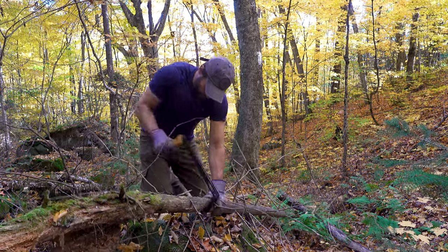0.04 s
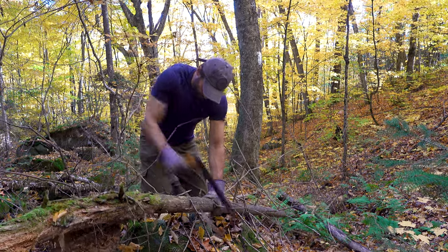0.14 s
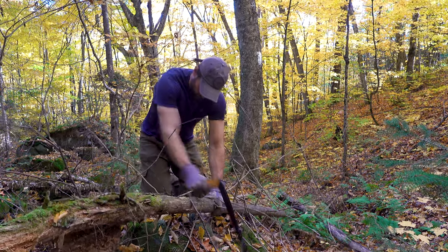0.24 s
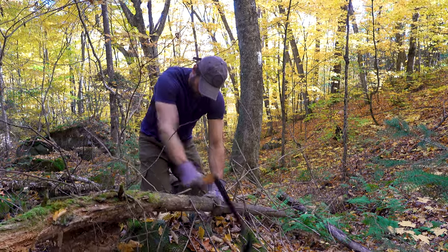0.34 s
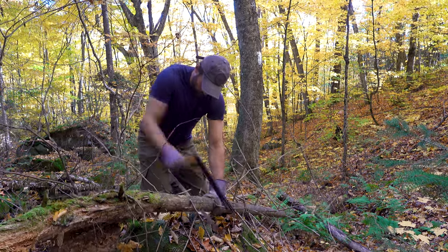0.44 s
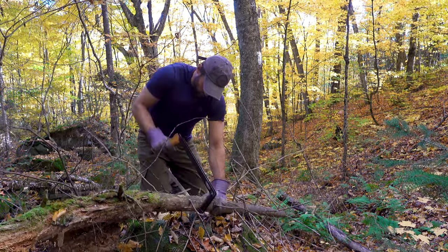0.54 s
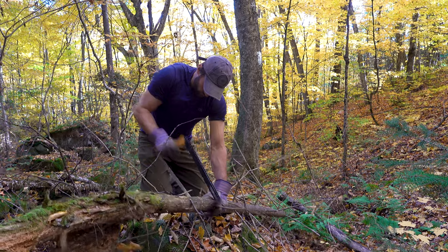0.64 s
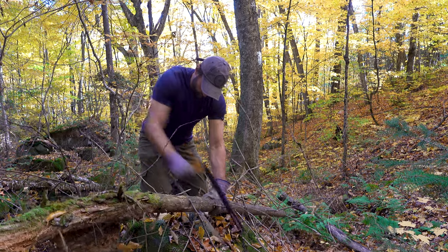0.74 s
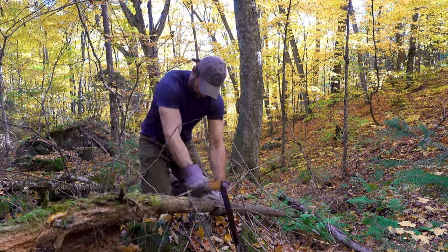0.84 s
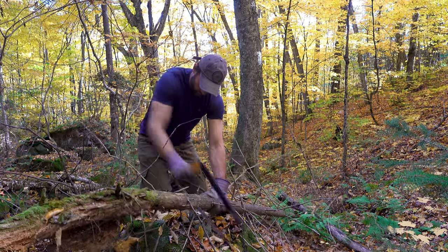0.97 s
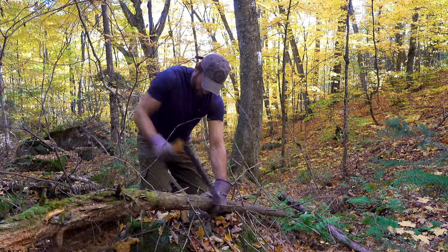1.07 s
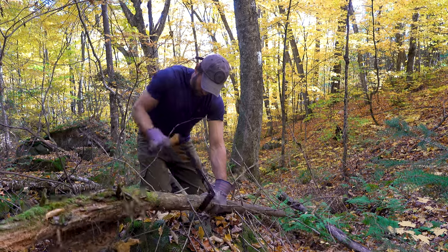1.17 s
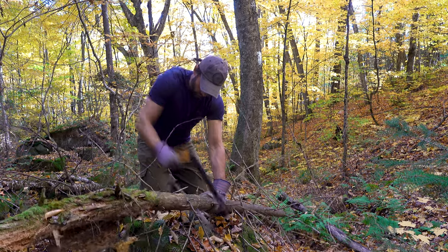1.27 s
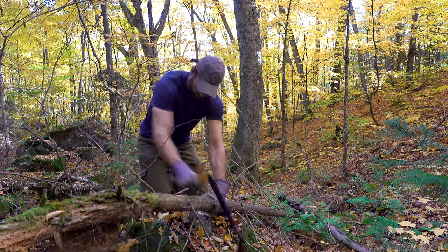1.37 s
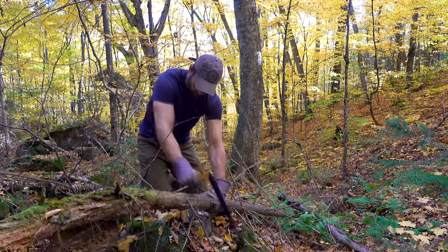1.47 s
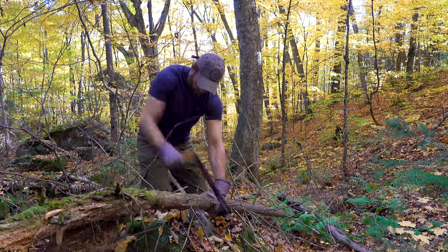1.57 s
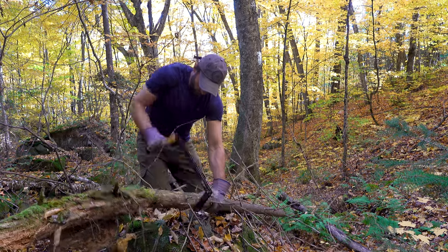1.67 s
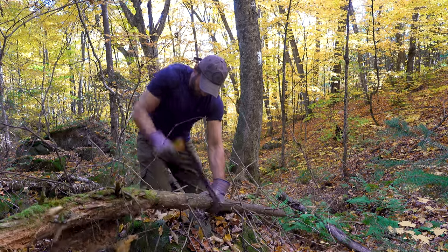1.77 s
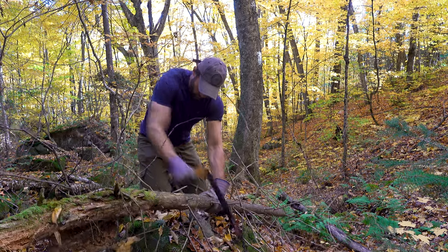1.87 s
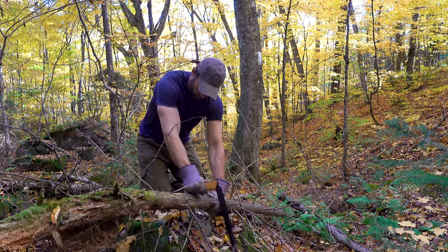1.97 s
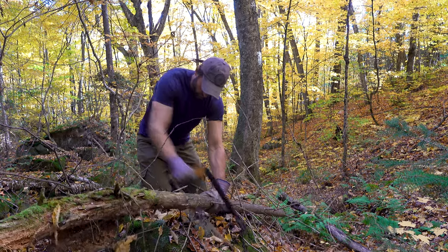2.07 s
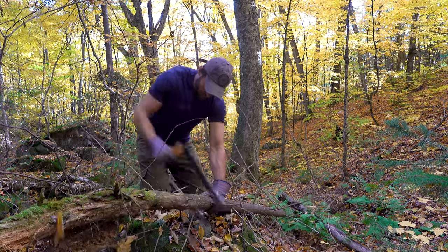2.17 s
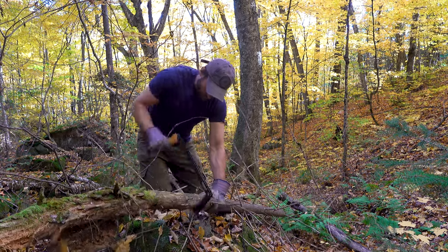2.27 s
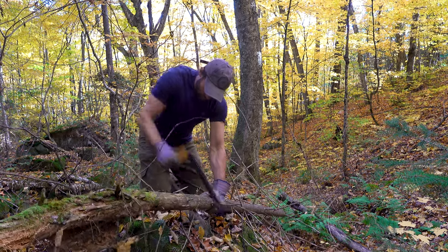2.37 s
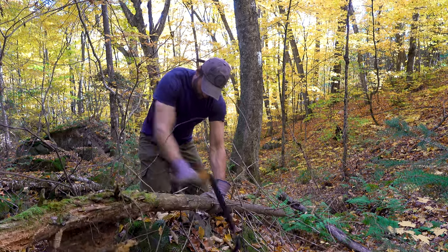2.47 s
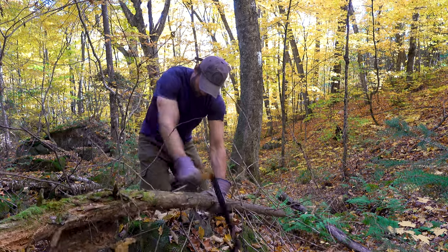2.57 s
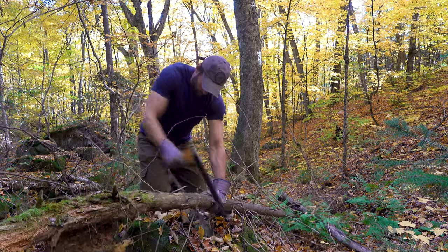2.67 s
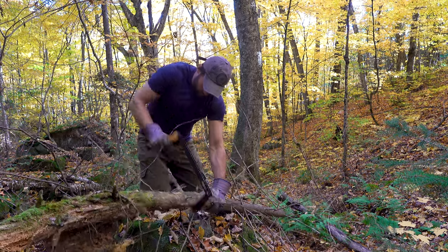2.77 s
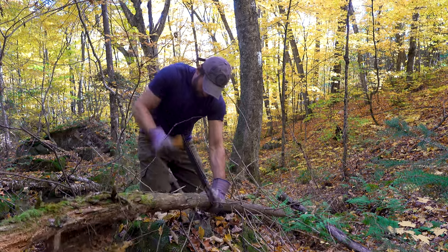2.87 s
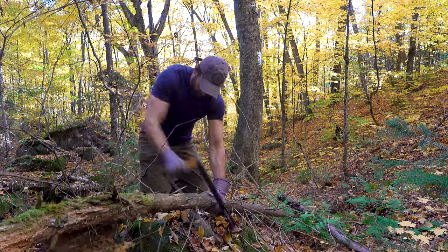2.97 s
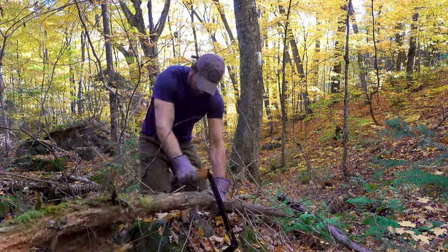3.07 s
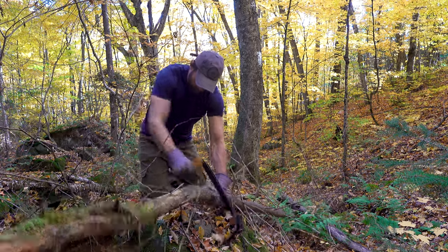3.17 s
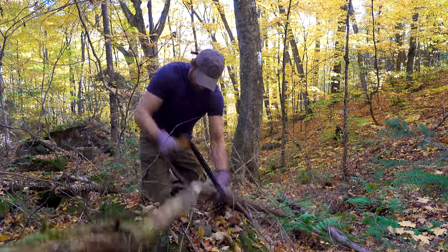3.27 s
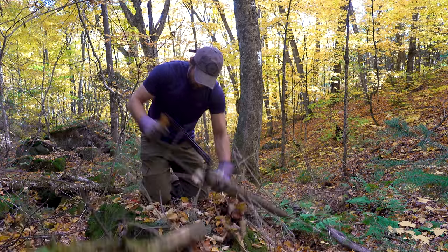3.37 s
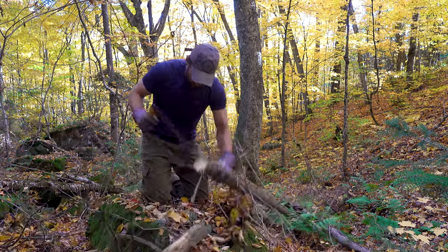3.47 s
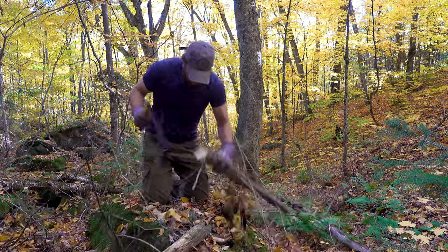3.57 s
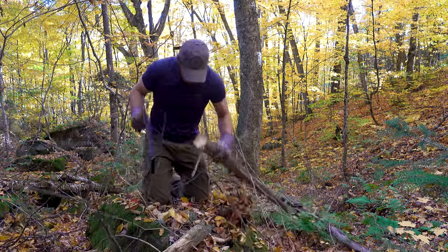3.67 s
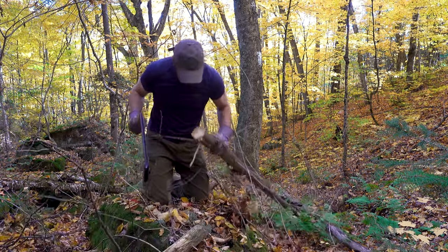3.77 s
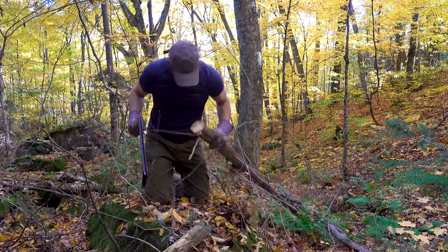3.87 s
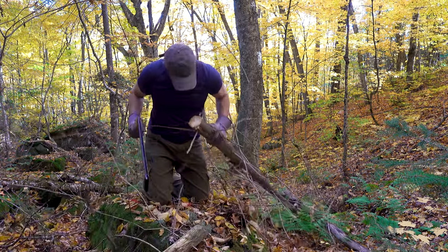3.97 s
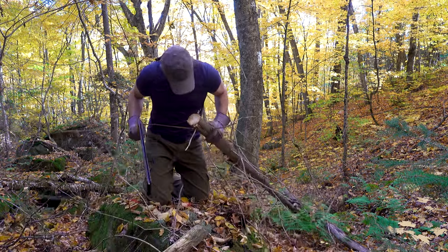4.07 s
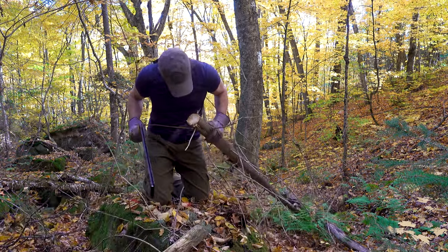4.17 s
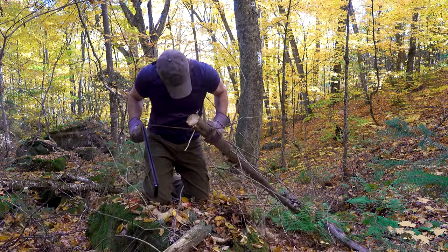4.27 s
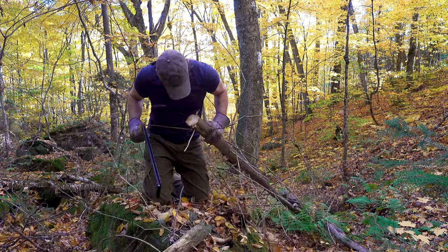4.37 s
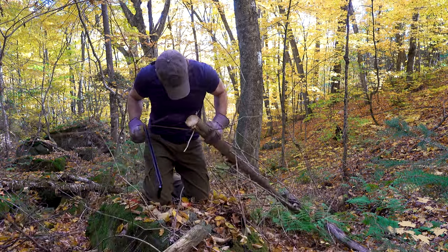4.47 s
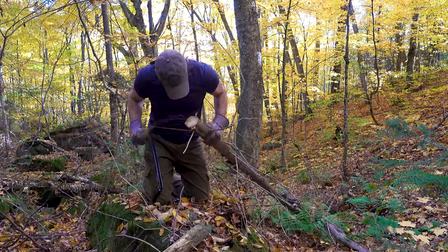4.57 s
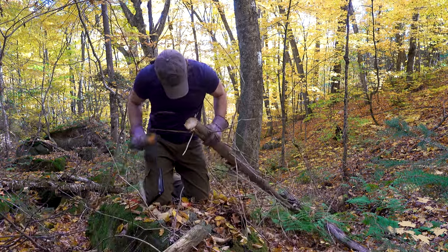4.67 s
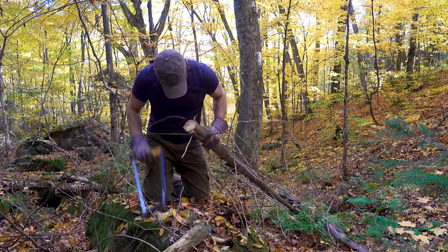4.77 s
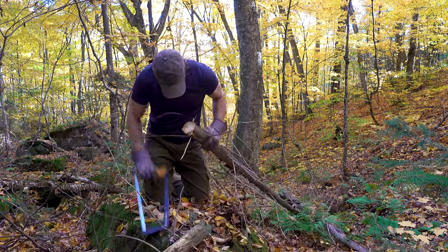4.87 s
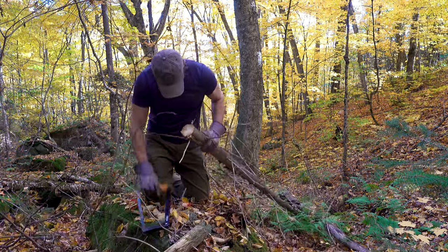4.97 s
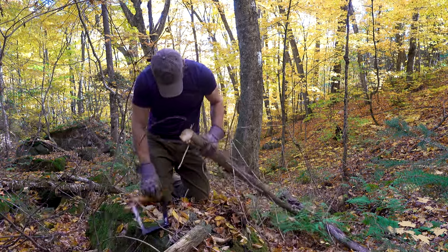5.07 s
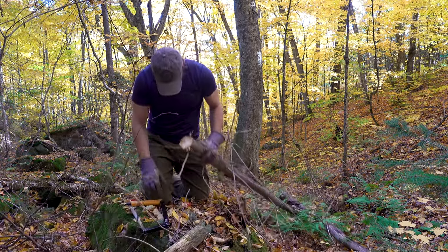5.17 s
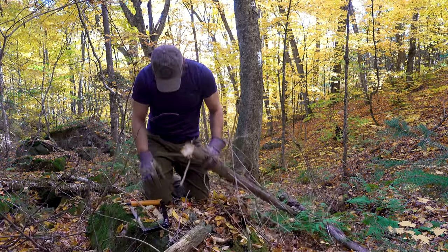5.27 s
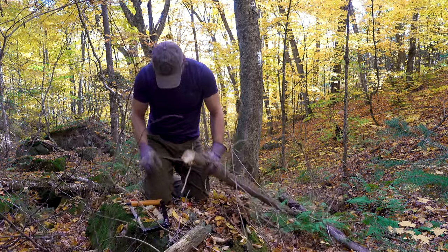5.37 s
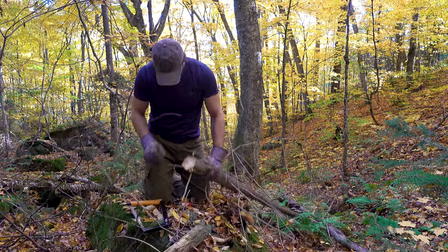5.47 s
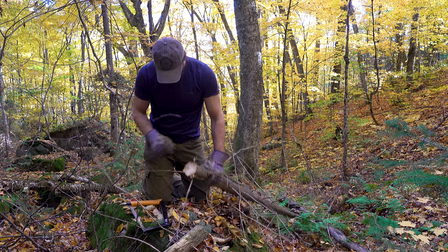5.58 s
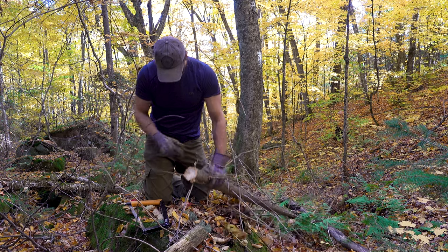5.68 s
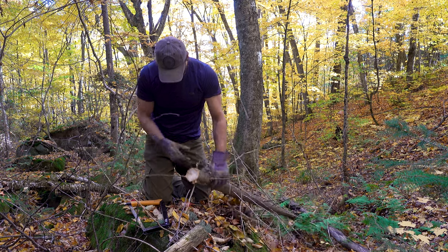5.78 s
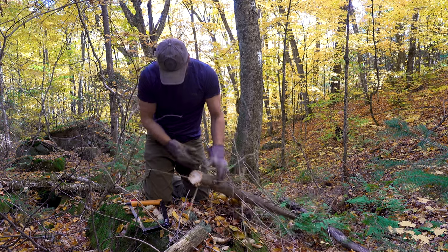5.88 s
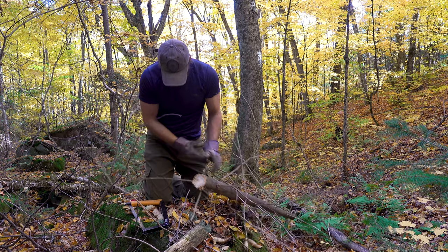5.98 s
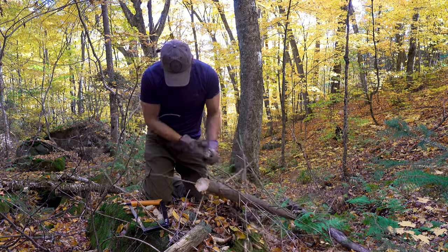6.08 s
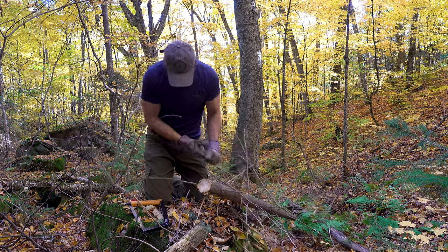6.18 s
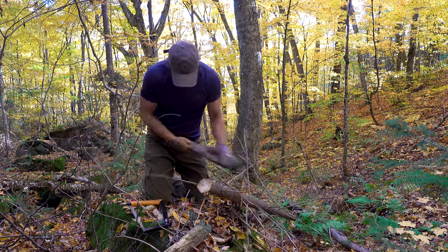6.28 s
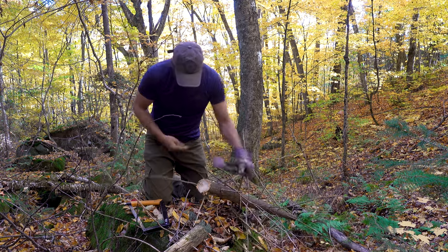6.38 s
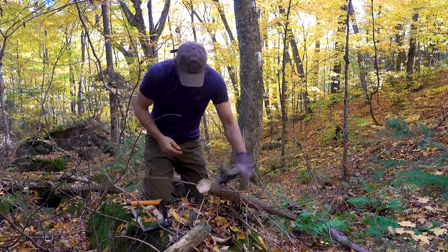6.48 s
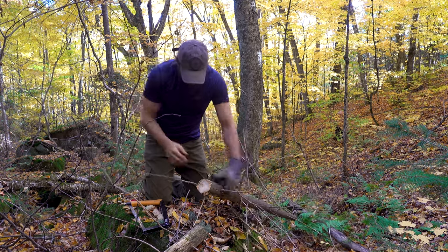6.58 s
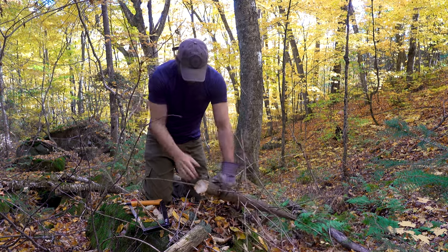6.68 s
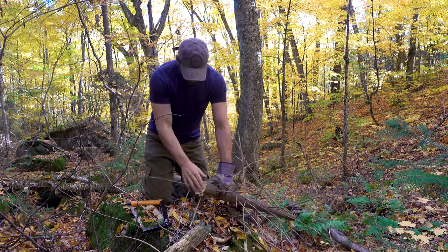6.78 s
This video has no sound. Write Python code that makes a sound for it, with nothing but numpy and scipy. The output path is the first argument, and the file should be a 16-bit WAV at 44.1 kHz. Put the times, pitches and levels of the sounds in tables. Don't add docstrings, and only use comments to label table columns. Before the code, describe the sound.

A hand saw rasps back and forth through a branch, which cracks and drops into dry leaves; later the saw clanks down amid rustling twigs.

```python
import sys
import numpy as np
from scipy import signal
from scipy.fft import rfft, irfft
from scipy.io import wavfile
from scipy.ndimage import uniform_filter1d

SR = 44100
rng = np.random.default_rng(int(sys.argv[2]) if len(sys.argv) > 2 else 0)


def gain_from_db(level_db):
    decades = np.asarray(level_db, float) / 20
    return 10 ** decades


def digitize_waveform(pressure):
    field = np.atleast_2d(pressure).T
    bounded = np.clip(field, -1, 1)
    quanta = np.round(bounded * 32767).astype(np.int16)
    wavfile.write(sys.argv[1], SR, quanta)


N = 300759

# (frequency [Hz], width [Hz], level [dB])
BLADE_MODES = [(1385, 80, -12), (1960, 6, 7), (2058, 30, 3), (2435, 35, -6), (2608, 30, -2), (2830, 35, -7),
               (3082, 40, -3), (3260, 55, -6), (3572, 35, -6), (4130, 60, -11), (4540, 90, -14),
               (5450, 80, -15), (5880, 60, -17), (13780, 70, -19)]


def evened(x):
    return x / np.sqrt(np.mean(x ** 2) + 1e-20)


def peaked(x):
    return x / abs(x).max()


def add(mix, s, sound):
    part = mix[round(s * SR):][:len(sound)]
    part += sound[:len(part)]


def colour(x, points, lo_hz=0, hi_hz=SR):
    f, level_db = np.transpose(points)
    hz = np.fft.rfftfreq(len(x), 1 / SR) + 1
    band = 1 / np.sqrt((1 + (lo_hz / hz) ** 8) * (1 + (hz / hi_hz) ** 8))
    shape = gain_from_db(np.interp(np.log(hz), np.log(f), level_db))
    return evened(irfft(rfft(x) * band * shape, len(x)))


def ring(x, hz, width):
    r = np.exp(-np.pi * width / SR)
    return 2 * signal.lfilter([1 - r], [1, -r * np.exp(2j * np.pi * hz / SR)], x).real


def wander(count, span):
    return evened(uniform_filter1d(uniform_filter1d(rng.standard_normal(count), span), span))


def grit(count, per_s, spread_db):
    hit = rng.random(count) < per_s / SR
    size = rng.exponential(1, count)
    sign = rng.standard_normal(count)
    return evened(hit * sign * gain_from_db(spread_db * np.minimum(size, 4)))


def patchy(x, depth_db, frames, bins):
    z = signal.stft(x, nperseg=256)[2]
    field = uniform_filter1d(rng.standard_normal(z.shape), bins, axis=0)
    field = uniform_filter1d(field, frames, axis=1)
    return evened(signal.istft(z * gain_from_db(depth_db * evened(field)), nperseg=256)[1][:len(x)])


def air():
    # (frequency [Hz], density [dB per Hz])
    air_spectrum = [(12, -31), (20, 0.5), (138, -4.5), (558, -3.5), (2460, -5.5), (3740, -2), (7110, -8),
                    (8410, -2.5), (9670, -19), (13900, -6), (16000, -28)]
    level = gain_from_db(-58 - 1.5 + wander(N, span=4000))
    return level * colour(rng.standard_normal(N), air_spectrum, 0, 12000)


def forest(x):
    t = np.arange(SR // 2) / SR
    taps = grit(len(t), 3000, 0.39) * (t > .004)
    low = signal.lfilter(*signal.butter(1, 3000, fs=SR), taps)
    tail = low * gain_from_db(-60 * t / 0.24) + (taps - low) * gain_from_db(-60 * t / 0.095)
    return signal.fftconvolve(x, tail / np.linalg.norm(tail))[:N]


def leaves():
    # (time [s], level [dB])
    leaf_levels = [(3.1, -35.5), (3.18, -44), (3.38, -34.5), (3.6, -43), (3.98, -54), (4.34, -53),
                   (4.52, -61), (4.72, -63.5), (4.95, -58), (5.1, -46.5), (5.37, -53), (5.68, -48),
                   (5.83, -54), (6.16, -51.5), (6.29, -62.5), (6.46, -61.5), (6.82, -59)]
    # (frequency [Hz], density [dB per Hz])
    leaf_spectrum = [(59, -38), (100, -12.5), (210, -13), (266, -6.5), (358, -7), (872, -1.5), (1060, -2),
                     (3780, -2.5), (6700, -6), (7940, -2), (10000, -13.5), (13500, -8.5), (16000, -19.5)]
    # (time [s], peak [dB], length [s], relative dull part [dB])
    sweeps = [(3.266, -33, 0.033, -5.5), (3.374, -40, 0.041, 2), (3.395, -29, 0.087, -5.5),
              (3.646, -56, 0.053, 7), (3.864, -48, 0.13, -7.5), (4.356, -51.5, 0.16, -23),
              (4.926, -42, 0.088, 1), (5.1, -43.5, 0.034, 1), (5.65, -58, 0.17, 3.5),
              (6.005, -50.5, 0.11, -3.5), (6.126, -44.5, 0.048, -25), (6.211, -52, 0.13, 0),
              (6.62, -63.5, 0.061, 3)]
    s, level_db = np.transpose(leaf_levels)
    t = np.arange(N) / SR
    clumps = gain_from_db(1.5 * wander(N, span=150) + 1. * wander(N, span=1200))
    rustle = evened(clumps * (rng.standard_normal(N) + 0.47 * grit(N, 1500, 2.0)))
    rustle = patchy(rustle, 3., frames=3, bins=10)
    crisp = gain_from_db(np.interp(t, s, level_db, left=-60.))
    dull = gain_from_db(-14.) * crisp ** .8
    for start, db, length, rel_db in sweeps:
        u = np.clip((t - start) / length, 0, 9)
        swell = gain_from_db(db) * np.minimum(u / 0.27, 1) * np.exp(-u ** 4.2)
        crisp = np.hypot(crisp, swell)
        dull = np.hypot(dull, swell * gain_from_db(rel_db))
    return crisp * colour(rustle, leaf_spectrum, 2880) + dull * colour(rustle, leaf_spectrum, 67, 2250)


def thump(db, hz, t60):
    t = np.arange(12000) / SR
    decay = gain_from_db(db - 60 * t / np.clip(t60, .05, .3))
    return decay * np.sin(2 * np.pi * hz * t) * (1 - np.exp(-t / 0.0059)) * 3.3


def clank(db, rattle, centre_hz):
    t = np.arange(9000) / SR
    u = t / np.clip(rattle, .0005, .05)
    knock = rng.standard_normal(len(t)) * np.sqrt(u) * np.exp(-u ** 2)
    modes = 0
    for hz, width, mode_db in BLADE_MODES[2:-1]:
        width = width + 30
        weight = gain_from_db(1.37 * mode_db - 4.7 * np.log2(hz / centre_hz) ** 2)
        modes = modes + weight * ring(knock, hz, width) / np.sqrt(width)
    thick = ring(ring(knock, centre_hz, 1100), centre_hz, 1100)
    metal = peaked(modes) + 0.72 * peaked(thick)
    return gain_from_db(db) * signal.lfilter(*signal.butter(4, 1700, "high", fs=SR), metal)


def crack(db, hz, bright_db, thud_db, t60):
    t = np.arange(4000) / SR
    snap_decay = gain_from_db(-60 * t / .007)
    splinter_decay = .3 * gain_from_db(-60 * t / np.clip(t60, .005, .2))
    burst = rng.standard_normal(len(t)) * (snap_decay + splinter_decay)
    burst[0] = 1
    wood = ring(burst, hz, 0.38 * hz) + 0.31 * ring(burst, 1.88 * hz, 0.32 * hz)
    wood += 0.065 * ring(burst, 1400, 670)
    wood = signal.lfilter(*signal.butter(2, 200, "high", fs=SR), wood)
    tick = signal.lfilter(*signal.butter(2, (3800, 13500), "band", fs=SR), burst)
    thud = np.sin(2 * np.pi * 220 * t * np.exp(-t / 0.11))
    thud += 0.33 * (np.sin(2 * np.pi * 820 * t) + np.sin(2 * np.pi * 430 * t))
    thud *= gain_from_db(-60 * t / 0.021)
    return gain_from_db(db) * (0.68 * peaked(wood) + 0.57 * gain_from_db(bright_db) * peaked(tick) + 0.74 * gain_from_db(thud_db) * thud)


def snaps():
    # (time [s], peak [dB], ring [Hz], relative thud [dB])
    knocks = [
        (0.611, -26, 683, -8),
        (1.185, -24, 745, -8),
        (1.726, -21, 632, -8),
        (2.306, -21., 624, -12.5),
        (2.833, -8.5, 476, -19.5),
    ]
    # (time [s], peak [dB],
    # ring [Hz], relative bright part [dB])
    fibres = [(0.301, -23, 2060, 8.5), (0.41, -19.5, 1740, -23), (0.42, -20, 1550, -31),
              (0.693, -24.5, 1190, -22), (0.95, -26.5, 1400, -6), (1.474, -23.5, 3180, -34),
              (1.84, -34, 2030, -14), (2.003, -7.5, 2860, -11), (2.369, -29, 2050, 0.1),
              (2.561, -9, 3100, -15), (2.624, -19.5, 1425, 1.5), (2.64, -26, 821, 8),
              (2.69, -21, 2050, -28), (2.84, -15, 515, 3.5), (3.049, -14, 4500, -3)]
    # (time [s], peak [dB], ring [Hz], relative bright part [dB])
    breaking = [(3.072, -15, 3324, 1.5), (3.116, -11, 980, -10), (3.12, -8, 3160, -0.5),
                (3.14, -16.5, 750, -6), (3.156, -13.5, 540, 9.5), (3.206, -14, 590, 7.5),
                (3.218, -13, 1210, -16), (3.235, -9.5, 2070, -23), (3.299, -12.5, 2480, -6),
                (3.335, -22, 3450, 2), (3.366, -16, 3390, 3), (3.385, -12, 3680, 5.5),
                (3.428, -17, 1170, -14), (3.452, -16, 1540, -14), (3.464, -17, 2180, -17),
                (3.499, -16, 1440, -1), (3.535, -10.5, 1430, -17)]
    # (time [s], peak [dB], ring [Hz], relative
    # bright part [dB])
    twigs = [(3.83, -32, 3460, -13), (3.882, -30, 4000, -7), (3.917, -33, 3500, -18),
             (3.979, -34, 920, -14), (4.126, -39, 926, -13), (4.216, -47.5, 1150, 22),
             (4.256, -39.5, 4000, 14), (4.273, -36, 690, -10), (4.293, -30, 1530, -13),
             (4.458, -35, 4030, -7), (4.554, -35.5, 3320, -4), (4.69, -36, 3500, -5),
             (4.774, -44, 1480, -6), (4.865, -37, 1330, 4),
             (5.07, -23, 1410, -21), (5.156, -29, 1500, -14), (5.203, -28, 2850, -6),
                (5.356, -29, 1370, -10), (5.428, -38, 2070, -19), (5.473, -43, 1420, -3),
                (5.516, -42, 1250, -8), (5.603, -40.5, 1660, 15), (5.711, -35, 3360, 5),
                (5.745, -25.5, 2940, 6.5), (5.822, -35, 3190, 7.5), (5.867, -36, 1500, -3),
                (6.057, -28, 2830, -21), (6.132, -29, 2870, 6), (6.502, -31, 1730, -23),
                (6.533, -27, 1250, -34), (6.635, -30.5, 2930, -30), (6.741, -45, 1360, -4),
                (6.775, -38, 3360, -3)]
    # bright part [dB], thud [dB], ring t60 [s]
    rows = [(s, db, hz, -39, thud_db, 0.037) for s, db, hz, thud_db in knocks]
    rows += [(*row, -34.5, 0.078) for row in fibres]
    rows += [(*row, -30, 0.07) for row in breaking]
    rows += [(*row, -28.5, 0.047) for row in twigs]
    return sorted(rows)


def arm():
    # (start [s], length [s], peak [dB], top tooth rate [1/s], pressure gained along the stroke [dB])
    strokes = [(-.16, 0.22, -32, 300, -2.5), (0.095, .225, -25.5, 333, 2.5), (0.403, 0.22, -36.5, 370, 1.7),
               (0.676, 0.22, -26, 350, 3), (0.972, 0.23, -36.5, 330, 1), (1.244, 0.23, -26, 323, 1.5),
               (1.536, 0.25, -36.5, 330, -4), (1.796, 0.23, -24, 340, 1), (2.067, 0.26, -38, 330, 2.5),
               (2.342, 0.24, -27.5, 340, 5.5), (2.638, 0.27, -34.5, 330, -1.5),
               (2.903, 0.21, -24.5, 313, 0)]
    # (relative level [dB], power of speed [1], gain along the stroke [dB])
    pull = [
        (1, 1.4, 0),
        (-11.5, 0.65, -9.5),
        (-7, 0.78, -1),
        (-23, 0.67, 14),
    ]
    # (relative level [dB], power of speed [1], gain along the stroke [dB])
    push = [
        (-2.3, 1.41, -3.5),
        (-11.5, 1.62, -3),
        (-7.5, 1.15, 0.5),
        (-11, 0.37, -2),
    ]
    rest_levels = [-57.5, -62, -58.5, -78]
    # (time [s], extra pressure [dB], length [s])
    catches = [
        (0.126, 3.5, 0.022),
        (0.693, 6.5, 0.017),
        (1.067, 2, 0.013),
        (1.429, 7.5, 0.018),
        (1.845, 0.5, 0.023),
        (2.187, 11., 0.0082),
        (2.22, 9, 0.024),
        (2.36, 8, 0.043),
        (2.682, 1.5, 0.026),
        (2.935, 0, 0.016),
    ]
    t = np.arange(N) / SR
    layers = np.full((4, N), -120.)
    rate, regular = np.zeros(N), np.zeros(N)
    for k, (start, length, peak_db, top_hz, lean_db) in enumerate(strokes):
        pushing = k % 2
        now = (t >= start) & (t < start + length)
        u = (t[now] - start) / length
        late = 1.163 if pushing else 1.176
        speed_db = 20 * np.log10(np.sin(np.pi * u ** late) + 1e-3)
        layers[:, now] = [peak_db + rel_db + power * speed_db + (gain_db + lean_db) * (2 * u - 1)
                          for rel_db, power, gain_db in (push if pushing else pull)]
        rate[now] = top_hz * np.sin(np.pi * np.clip(u, .08, .92))
        regular[now] = .8 if pushing else .1
    for start, extra_db, length in catches:
        u = np.clip((t - start) / length, 0, 9)
        layers += extra_db * np.minimum(u / 0.16, 1) * np.exp(-u ** 2)
    cut_end = strokes[-1][0] + strokes[-1][1]
    rest_db = np.where(t < cut_end, np.array(rest_levels)[:, None], -120.)
    return np.maximum(layers, rest_db), rate, regular


def saw():
    # (frequency [Hz], density [dB per Hz])
    rasp_spectrum = [(88, -66), (150, -50), (334, -23), (457, -21), (730, -2), (1830, -6), (2100, 0),
                     (2310, -2.5), (3160, -1.5), (3920, -10.5), (6260, -21), (8400, -13.5), (11000, -28.5),
                     (13700, -15.5), (16000, -27.5)]
    # (frequency [Hz], width [Hz], level [dB])
    limb_modes = [(456, 190, -9), (738, 104, -3.5), (852, 16, 1), (1127, 71, -12.5)]
    layers, rate, regular = arm()
    turns = np.cumsum(rate * (1 + .04 * wander(N, span=100))) / SR
    bite = np.exp(0.17 * regular * np.cos(2 * np.pi * turns))
    snag = gain_from_db(1.38 * wander(N, span=120) + 1.0 * wander(N, span=900))
    tear = bite * (1.06 * rng.standard_normal(N) + .5 * grit(N, 6000, 0.6))
    tear = patchy(tear, 2., frames=8, bins=3)
    rasp, body, hiss, buzz = uniform_filter1d(gain_from_db(layers), 200) * snag
    force = rasp * tear * gain_from_db(-4 * regular)
    grip = gain_from_db(3.5 * wander(N, span=1800))

    def slide():
        return np.roll(grip, rng.integers(N))

    blade = sum((-1) ** k * gain_from_db(db) * ring(force * slide(), hz, width)
                for k, (hz, width, db) in enumerate(BLADE_MODES))
    limb = sum(gain_from_db(db) * ring(body * tear * slide(), hz, width) for hz, width, db in limb_modes)
    steady = regular * gain_from_db(3.5 * wander(N, span=250)) * np.clip((rate - 140) / 60, 0, 1)
    hum = body * steady * np.cos(2 * np.pi * turns)
    low = (1 - regular) * colour(tear, rasp_spectrum, 150, 413)
    return (gain_from_db(-7) * rasp * colour(tear, rasp_spectrum, 1145, 5130)
            + gain_from_db(13) * blade + gain_from_db(13) * limb
            + gain_from_db(-8.5) * body * colour(tear, rasp_spectrum, 540, 2060)
            + gain_from_db(-1.5) * hiss * colour(tear, rasp_spectrum, 4560)
            + buzz * low + gain_from_db(-6.5) * hum)


def scene():
    # (time [s], peak [dB], rattle length [s], centre of struck modes [Hz])
    clanks = [
        (4.937, -15.5, 0.0026, 2300),
        (4.942, -24.5, 0.0064, 2070),
        (4.968, -23, 0.015, 2980),
        (4.978, -27.5, 0.019, 2350),
        (5.009, -30.5, 0.016, 3580),
        (5.037, -34.5, 0.04, 5060),
        (5.11, -27.5, 0.0056, 3600),
    ]
    # (time [s], peak [dB], frequency [Hz], t60 [s])
    thumps = [(0.299, -60, 91, 0.077), (0.619, -59, 37.7, 0.15), (0.869, -64, 61.7, 0.13),
              (1.019, -65, 61.9, 0.12), (1.199, -60, 40.5, 0.17), (1.739, -54, 45.8, 0.11),
              (2.019, -64, 43.1, 0.17), (2.329, -59, 37.7, 0.13), (2.569, -62, 67.3, 0.17),
              (2.849, -61, 37.7, 0.14), (3.299, -68, 59.2, 0.15), (3.389, -55, 59.2, 0.1),
              (3.678, -62, 67.3, 0.17), (6.529, -76, 86.1, 0.12)]
    near = saw() + leaves()
    for s, *row in snaps():
        add(near, s, crack(*row))
    for s, *row in clanks:
        add(near, s, clank(*row))
    for s, *row in thumps:
        add(near, s, thump(*row))
    return (near + gain_from_db(-17.5) * forest(near) + air())[None]


def roll_off(x):
    return signal.sosfilt(signal.butter(12, 16820, fs=SR, output="sos"), x)


def record(dry):
    edge = signal.firwin(255, 15750, window=("kaiser", 5), fs=SR)
    mix = signal.oaconvolve(dry, edge[None], "same")
    return roll_off(mix)


dry = scene()
out = record(dry)
digitize_waveform(out)
```